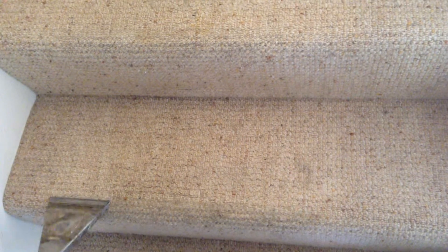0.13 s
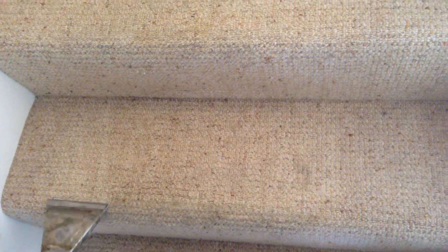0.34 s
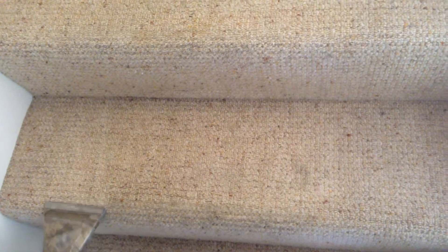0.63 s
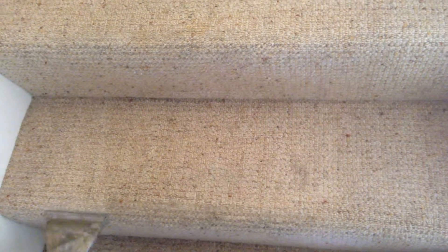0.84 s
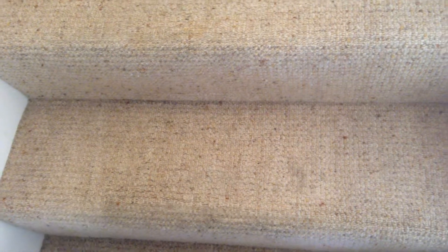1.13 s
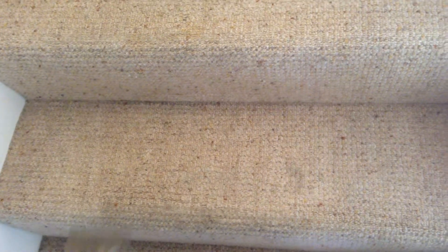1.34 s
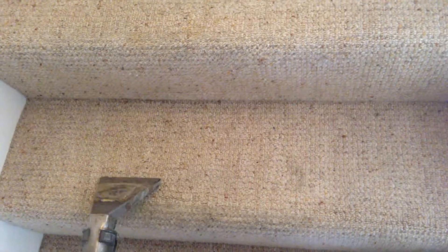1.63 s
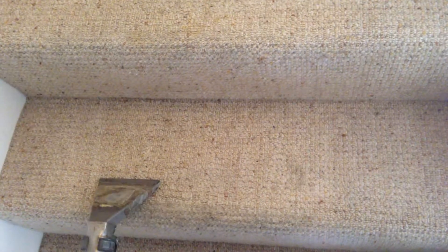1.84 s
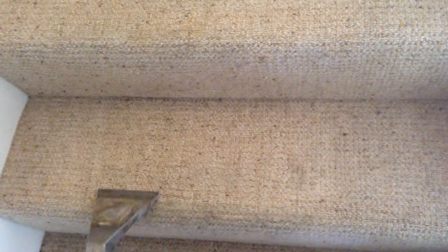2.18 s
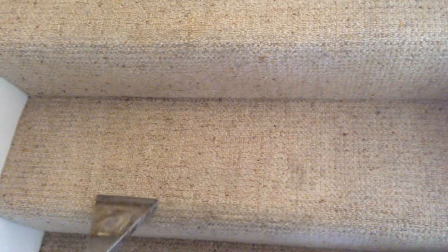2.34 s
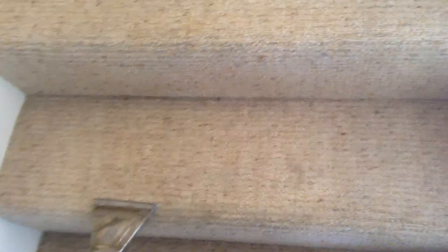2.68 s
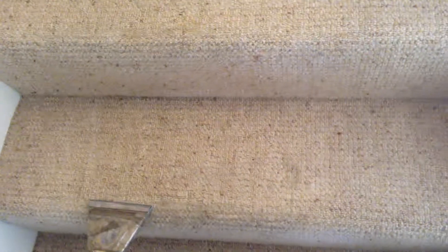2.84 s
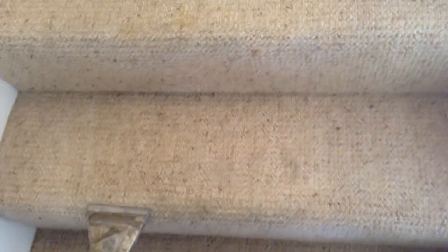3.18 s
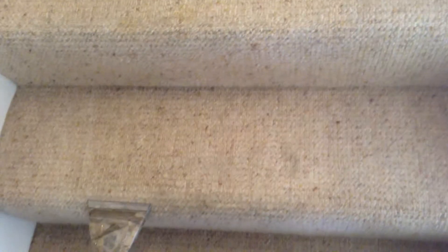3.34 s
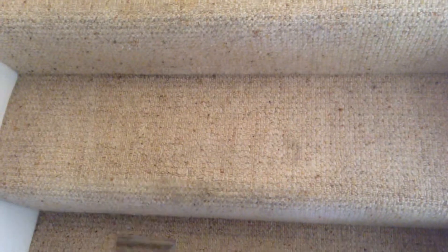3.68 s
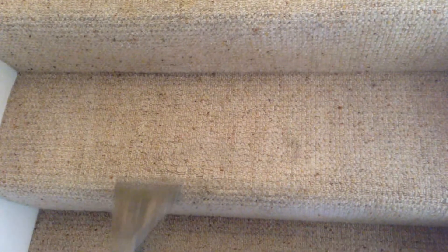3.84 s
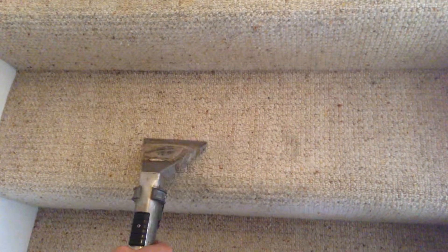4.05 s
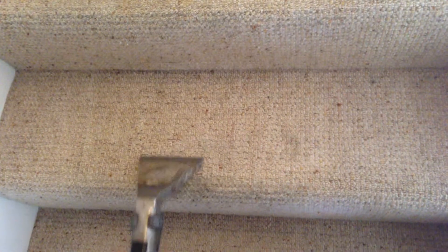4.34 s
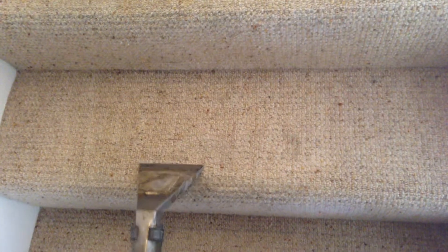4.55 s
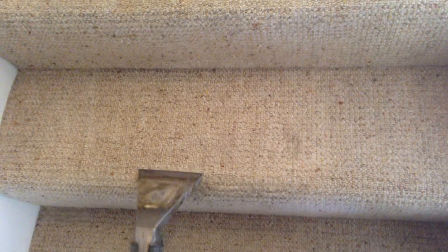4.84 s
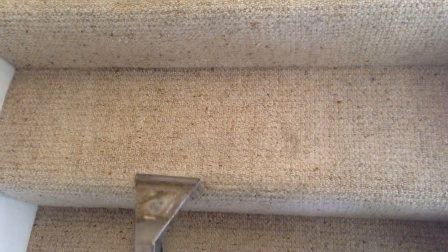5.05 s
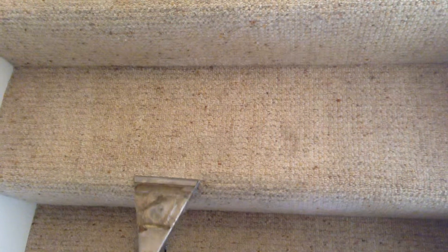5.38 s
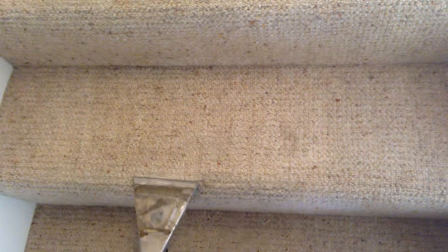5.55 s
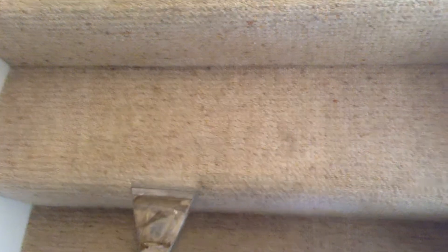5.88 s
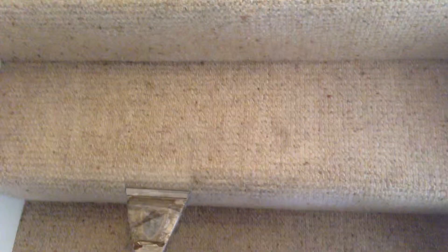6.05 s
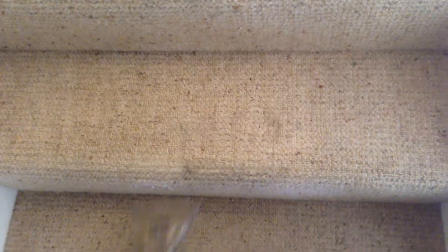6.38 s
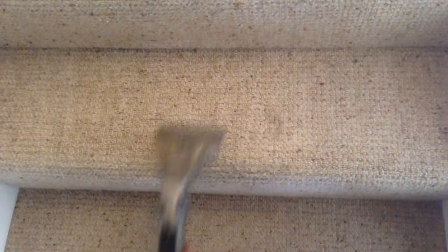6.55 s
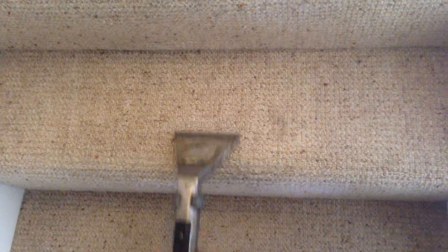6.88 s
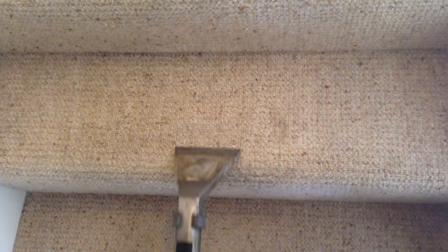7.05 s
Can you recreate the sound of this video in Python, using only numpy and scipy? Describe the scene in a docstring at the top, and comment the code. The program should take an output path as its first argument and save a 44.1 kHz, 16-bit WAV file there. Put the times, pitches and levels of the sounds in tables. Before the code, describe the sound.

Wet suction hiss in repeated strokes over a humming cleaning machine, each ending in a spurting slurp, a gulp of air and a dull wooden knock.

```python
"""A wet hiss comes first: a carpet extractor's hand tool is mid-stroke on a carpeted staircase.
Close by, its water pump hums with a slow beat and its vacuum motor whirs, higher while the tool is sealed.
The slot slurps over the edge of the step, gulps and rushes with free air, then the steel tool thumps
onto the next tread. Tones make the motors, shaped noise the air and water, decaying partials the wood."""
import sys
import numpy as np
from scipy import signal
from scipy.fft import rfft, irfft, next_fast_len
from scipy.io import wavfile
from scipy.ndimage import uniform_filter1d, map_coordinates

SR = 44100
rng = np.random.default_rng(int(sys.argv[2]) if len(sys.argv) > 2 else 0)


def transcribe(signal):
    """Save signal, clipped to [-1, 1], as a 16-bit WAV file at the path in sys.argv[1]."""
    frames = np.atleast_2d(signal).T
    limited = np.clip(frames, -1, 1)
    pcm = np.round(limited * 32767).astype(np.int16)
    wavfile.write(sys.argv[1], SR, pcm)


N = 318402
T = np.arange(N) / SR  # time in seconds

# Strokes of the tool, one a tread; times may lie outside the scene. Each row: lands in s, sealed in s,
# slot reaches the edge in s, lifts in s, hiss in relative dB, motor speed-up in Hz, lower slot resonance in Hz,
# its boost in dB, upper slot resonance in Hz, its boost in dB, gulp on lifting in relative dB.
STROKES = [(-.55, -0.258, 0.71, 1.01, -37.5, 12.7, 3390, 8.5, 3800, 2.5, -33.5),
           (1.595, 1.893, 3.02, 3.545, -38, 12, 3170, 6, 3910, 6.5, -33.5),
           (4.12, 4.32, 5.87, 6.125, -37.5, 17.5, 3100, 5.5, 4030, 2.5, -39.5),
           (6.705, 6.918, 9, 8.6, -37, 13, 2900, 8.5, 3680, 3.5, -38)]


def amp(db):
    """Decibels to gain."""
    return 10 ** (np.asarray(db) / 20)


def unit(x):
    """Scale to rms 1."""
    return x / np.sqrt(np.mean(x ** 2) + 1e-20)


def ramp(x):
    """Hold between 0 and 1."""
    return np.clip(x, 0, 1)


def ease(x):
    """A smooth step from 0 to 1."""
    return np.sin(np.pi / 2 * ramp(x)) ** 2


def along(points, hz):
    """(Hz, value) points read on a log axis."""
    f, v = np.transpose(points)
    return np.interp(np.log(hz + 1), np.log(f + 1), v)


def wobble(rate):
    """A smooth random curve, rate knots a second."""
    knots = rng.standard_normal(int(N * rate / SR) + 4)
    return map_coordinates(knots, [T * rate])


def filtered(x, response):
    """x times a response of frequency."""
    m = next_fast_len(N + SR // 2)
    return irfft(rfft(x, m) * response(np.fft.rfftfreq(m, 1 / SR)), m)[:N]


def coloured(x, spectrum):
    """x shaped by (Hz, dB) points, at rms 1."""
    return unit(filtered(x, lambda hz: amp(along(spectrum, hz))))


def turbulence(patchy_db):
    """White noise with short-lived patches of random gain, at rms 1."""
    z = signal.stft(rng.standard_normal(N), nperseg=512)[2]
    field = uniform_filter1d(rng.standard_normal(z.shape), size=4, axis=0)  # over frequency
    field = uniform_filter1d(field, size=14, axis=1)  # over time
    return unit(signal.istft(z * amp(patchy_db * unit(field)), nperseg=512)[1][:N])


def droplets(rate, spread_db):
    """Random impacts of uneven size, rate a second, at rms 1."""
    hits = rng.random(N) < rate / SR
    return unit(hits * rng.standard_normal(N) * amp(spread_db * rng.standard_normal(N)))


def moving_peak(x, centre_hz, boost_db, width_hz):
    """A resonance whose frequency and strength follow curves."""
    hz, t, z = signal.stft(x, SR, nperseg=1024)
    offset = (hz[:, None] - np.interp(t, T, centre_hz)) / width_hz
    gain = amp(np.interp(t, T, boost_db) / (1 + offset ** 2))
    return signal.istft(z * gain, SR, nperseg=1024)[1][:N]


def current_stroke():
    """The columns of the stroke under way, one value per sample."""
    rows = np.array(STROKES)
    return rows[np.searchsorted(rows[1:, 0], T)].T


def stairwell(x, t60, wet_db):
    """Close walls give a short, carpet-damped answer: a decaying noise tail."""
    t = np.arange(SR // 3) / SR
    tail = rng.standard_normal(len(t)) * amp(-60 * t / t60) * (t > .003)
    return x + amp(wet_db) * signal.fftconvolve(x, tail / np.linalg.norm(tail))[:N]


def pump(mains_db=-35, in_step=.33):
    """The pump motor lags the mains slightly, so its fourth order beats slowly against the magnetic hum."""
    mains_hz, pump_hz = 50, 24.75
    # Tones of the pump. Each row: multiple of the shaft rate, rms level in dB.
    pump_orders = [(2, -53.5), (3, -64), (4, -40.5), (5, -51), (6, -46), (8, -54.5), (17, -59), (23, -63)]
    since = T - in_step  # seconds from the moment both hums are about in step
    hum = amp(mains_db) * np.cos(2 * np.pi * 2 * mains_hz * since)
    turn = 2 * np.pi * pump_hz * since + 0.041 * wobble(6.8)
    for k, db in pump_orders:
        k = round(k)
        phase = 0 if k == 4 else rng.uniform(0, 2 * np.pi)
        hum = hum + amp(db + 0.94 * wobble(9)) * np.cos(k * turn + phase)
    return np.sqrt(2) * hum  # rms to peak


def vacuum():
    """The motor speeds up while the nozzle is blocked; its exhaust rushes and rings the housing."""
    free_hz, speed_up_hz_per_s, slow_down_s = 352.4, 12.5, .8
    # Standing waves make the whir's loudness depend on its pitch. Each row: pitch in Hz, rms level in dB.
    whir_levels = [(352, -52.5), (358, -49), (363, -57), (366, -59), (368, -48), (370, -45)]
    # Narrow resonances of the machine's housing. Each row: centre in Hz, width in Hz, relative level in dB.
    housing_modes = [(276.7, 8.7, -5), (888.6, 17, 2), (989, 44, 5.5), (1053.6, 37, 5.5), (1255, 27, -8),
                     (1630, 16, -11), (1760, 12, -15), (2010, 12, -2), (2176, 17, 1.5)]
    # Exhaust air of the machine. Each row: frequency in Hz, relative density in dB per Hz.
    exhaust_spectrum = [(25, -5), (45, -5.5), (80, 9.5), (200, -8), (330, -5.5), (520, -13), (780, -5.5),
                        (1020, -9), (1300, -3), (2300, -4), (3200, -7.5), (5000, -11.5), (8000, -22.5),
                        (15000, -40)]

    shaft_hz = free_hz
    for _, sealed, _, lifts, _, gain_hz, *_ in STROKES:
        blocked = ease((T - sealed) * speed_up_hz_per_s / gain_hz)
        freed = ease((T - lifts) / slow_down_s)
        shaft_hz = shaft_hz + gain_hz * blocked * (1 - freed)
    whir_db = along(whir_levels, shaft_hz) + 3.0 + 1.6 * wobble(8)  # 3 dB from rms to peak
    whir = amp(whir_db) * np.sin(2 * np.pi * np.cumsum(shaft_hz) / SR)

    def ring(hz):
        return sum(amp(db) / np.sqrt(width) / (1 + (2 * (hz - centre) / width) ** 2)
                   for centre, width, db in housing_modes)

    housing = unit(filtered(rng.standard_normal(N), ring))
    exhaust = coloured(turbulence(patchy_db=2.5), exhaust_spectrum)
    return whir + amp(-44.5) * housing + amp(-39) * exhaust


def open_nozzle():
    """Lifted clear, the tool gulps air, then settles to a low, fluttering rush until it lands again."""
    # Relative levels: the steady rush, and its swell near the next tread.
    rush_db, approach_db, approach_s = -46.5, -47, .12
    gulp_delay_s, gulp_rise_s, gulp_decay_s = 0.051, 0.038, .12  # the first gulp of free air after a lift
    # Air into the open nozzle. Each row: frequency in Hz, relative density in dB per Hz.
    nozzle_spectrum = [(70, -8), (170, 6.5), (300, 4.5), (400, -3), (520, -6), (800, -7.5), (1400, -13),
                       (2400, -16), (3500, -20), (7000, -37.5), (15000, -39)]
    flow = np.zeros(N)
    for (_, _, _, lifts, *_, gulp_db), (lands, *_) in zip(STROKES, STROKES[1:]):
        since, left = T - lifts - gulp_delay_s, lands - T
        gulp = amp(gulp_db) * np.exp(-np.abs(since) / gulp_decay_s)
        approach = amp(approach_db) * np.exp(-np.abs(left) / approach_s)
        gate = ramp(1 + np.minimum(since, left) / gulp_rise_s)
        flow += np.sqrt(gulp ** 2 + amp(rush_db) ** 2 + approach ** 2) * gate
    flutter = amp(1.5 + 0.88 * wobble(45))
    return flow * flutter * coloured(turbulence(patchy_db=1.5), nozzle_spectrum)


def knocks(clack_t60=0.13):
    """Each knock of a landing is a cushioned push, the ring of the tread and a short clack of steel."""
    # The tool lands on a tread. Each row: start in seconds, thump in relative dB, steel clack in dB.
    landings = [(1.604, -15.5, -31.5), (1.62, -27, -44), (4.116, -10, -25), (4.16, -25, -28.5),
                (6.705, -31, -31.5), (6.733, -14.5, -26)]
    # The wooden tread's partials. Each row: frequency in Hz, relative level in dB, 60 dB decay in seconds.
    tread_modes = [(79.6, -14, 0.28), (132, -12, 0.19), (164, -8, 0.1), (209.5, -15.5, 0.33),
                   (280, -15.5, .16), (380, -13, 0.085), (576, -16, 0.046), (770, -23, 0.041)]
    t = np.arange(SR // 2) / SR
    thumps, clacks = np.zeros(N), np.zeros(N)
    push = -np.cos(2 * np.pi * 180 * (t - .004)) * np.exp(-((t - .004) / .003) ** 2)
    swell = 1 - np.exp(-t / 0.0033)  # the pile softens the blow before the wood rings
    for s, thump_db, clack_db in landings:
        ring = sum(amp(db + rng.normal(0, 2.0) - 60 * t / t60) * np.sin(2 * np.pi * hz * t)
                   for hz, db, t60 in tread_modes)
        thump = push * np.sqrt(swell) + ring * swell
        clack = swell * amp(-60 * t / clack_t60)
        thumps += amp(thump_db) * np.interp(T - s, t, thump, left=0, right=0)
        clacks += amp(clack_db) * np.interp(T - s, t, clack, left=0, right=0)
    steel = [(150, 7), (600, 5.5), (2200, 2.5), (5000, 0.0), (15000, -27)]  # (Hz, dB)
    return thumps + clacks * coloured(rng.standard_normal(N), steel)


def slurp():
    """Air breaks in under the lip and tears off water in rapid, uneven spurts that swell and stop."""
    round_db = 1  # how softly a swell turns over
    treble_hz = 2900  # the treble gain eases in from half of this and is full from here up
    hollow_width_hz, sink_hz, sink_s = 95, 110, 0.087
    # Water torn through the half-open slot. Each row: peak in s, level before rounding in dB, 20 dB rise in s,
    # 20 dB fall in s, hollow under the lip in Hz, its boost in dB, treble gain in dB.
    swell_rows = [(.757, -27.3, 0.22, 0.0355, 1530, 9.5, 4), (1.07, -32, .1, 0.1, 1520, 12, 1),
                  (3.038, -17.5, 0.2332, 0.0443, 1876, 9, -0.5), (3.58, -30.5, 0.1, 0.08, 1390, 11.5, 1),
                  (4.38, -39, 0.1, 0.8, 2150, 6, 4), (5.85, -32, 0.1, 0.1, 1504, 7, 1),
                  (6.185, -28.5, 0.27, 0.17, 1350, 3.5, -2.5)]
    # Wet air in the slot. Each row: frequency in Hz, relative density in dB per Hz.
    slurp_spectrum = [(80, -14), (170, -5.5), (300, -5), (400, -6), (540, -18.5), (660, -8), (820, -8),
                      (1100, 3), (1450, 0), (2100, -1), (2500, -2.5), (3300, -0.5), (4300, -4), (6000, -9),
                      (15000, -26)]

    rows = np.array(swell_rows)
    s, db, rise, fall = rows.T[:4, :, None]
    rising = 20 * (s - T) / rise / round_db
    falling = 20 * (T - s) / fall / round_db
    swells_db = db - round_db * np.logaddexp(rising, falling)
    strongest = swells_db.argmax(axis=0)  # it sets the colour
    peak_s, *_, hollow_hz, hollow_db, treble_db = rows[strongest].T

    spray = coloured(turbulence(patchy_db=1.0) + 0.37 * droplets(rate=1200, spread_db=0), slurp_spectrum)
    treble = filtered(spray, lambda hz: ease(2 * hz / treble_hz - 1))
    spray = spray + (amp(treble_db) - 1) * treble
    # the hollow's ring sinks as the gap widens towards the peak
    sinking_hz = hollow_hz + sink_hz * ramp((peak_s - T) / sink_s)
    spray = moving_peak(spray, sinking_hz, hollow_db, hollow_width_hz)
    return amp(swells_db.max(axis=0) + 1.75 * wobble(110)) * spray


def suction():
    """Air and fine spray hiss through the pile: the slot seals, grows louder towards the edge and lets go."""
    open_db, touch_db = -51.5, -50.5  # relative hiss with the tool in the air and at first touch
    draw_db, past_edge_db = 3.5, 1.66  # gain up to the edge of the step, and what is left past it
    edge_s, release_s = 0.058, .08  # the slot crosses the edge; the seal lets go
    # as the tool is drawn back it tilts: the slot's resonances climb and the lower one fades
    slot_climb_hz_per_s, lower_fade_db_per_s, slot_width_hz = 164, 4.5, 135
    echo_s, echo_shrink_per_s = 0.001396, .2  # the step's echo comes ever sooner
    # Hiss through the pile. Each row: frequency in Hz, relative density in dB per Hz.
    pile_spectrum = [(400, -18), (900, -15), (1500, -8), (2100, -5.5), (2700, -3), (3400, 0), (4800, 0),
                     (5800, 0), (7500, -3.5), (9300, -5.5), (12000, -9), (15500, -13)]

    lands, sealed, edge, lifts, hiss_db, _, lower_hz, lower_db, upper_hz, upper_db, _ = current_stroke()
    pressed_db = touch_db + (hiss_db - touch_db) * ramp((T - lands) / (sealed - lands))
    drawn_db = draw_db * ramp((T - sealed) / (edge - sealed))
    drawn_db = drawn_db + (past_edge_db - draw_db) * ramp((T - edge) / edge_s)
    held = 1 - ramp((T - lifts) / release_s)
    level_db = open_db + (pressed_db + drawn_db - open_db) * held

    drawn_s = np.clip(T, sealed, lifts) - sealed
    climb_hz = slot_climb_hz_per_s * drawn_s
    air = coloured(turbulence(patchy_db=1.38) + 0.33 * droplets(rate=2500, spread_db=5.5), pile_spectrum)
    air = moving_peak(air, lower_hz + climb_hz, lower_db - lower_fade_db_per_s * drawn_s, slot_width_hz)
    air = moving_peak(air, upper_hz + climb_hz, upper_db, slot_width_hz)
    delay_s = echo_s * np.exp(-echo_shrink_per_s * drawn_s)
    echo = np.interp(T - delay_s, T, air)  # its comb of ridges glides upwards
    return amp(level_db + 4.5 + 0.22 * wobble(30)) * (air + 0.08 * echo)


def scene():
    """Machine and hand tool, heard at one point above the stairs; both channels are the same."""
    tool = suction() + stairwell(slurp() + open_nozzle(), t60=0.17, wet_db=-7.5)
    mono = pump() + vacuum() + tool + knocks()
    return np.array([mono, mono])


def record(dry):
    """The microphone passes nothing above a sharp band limit."""
    top_hz = 15600
    return np.array([filtered(channel, lambda hz: hz < top_hz) for channel in dry])


dry = scene()
out = record(dry)
transcribe(out)
```